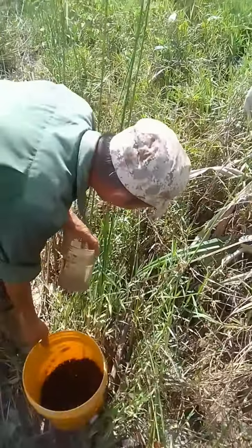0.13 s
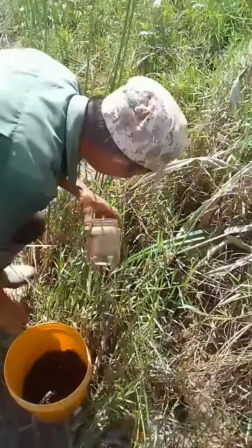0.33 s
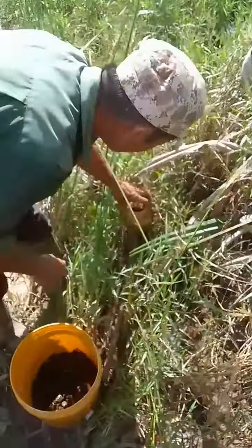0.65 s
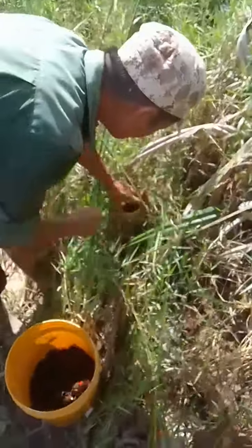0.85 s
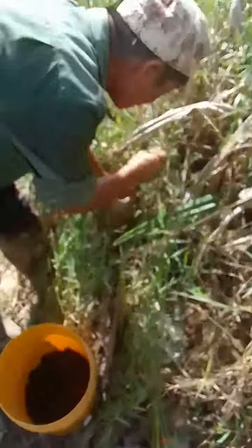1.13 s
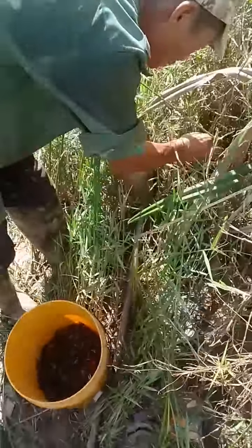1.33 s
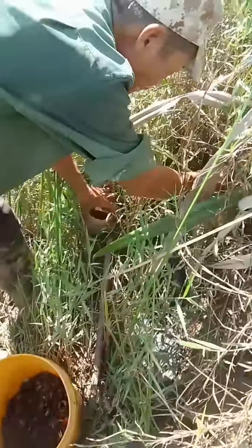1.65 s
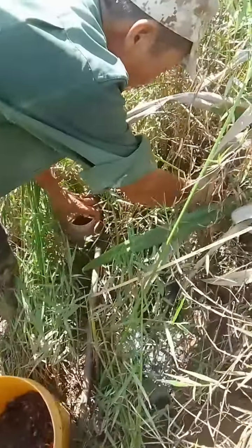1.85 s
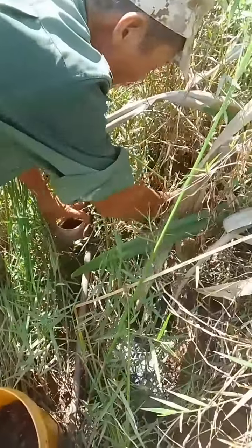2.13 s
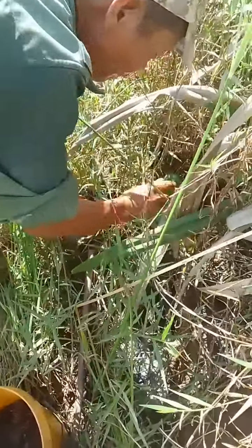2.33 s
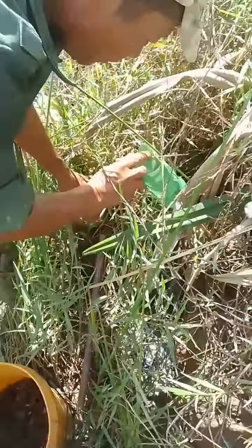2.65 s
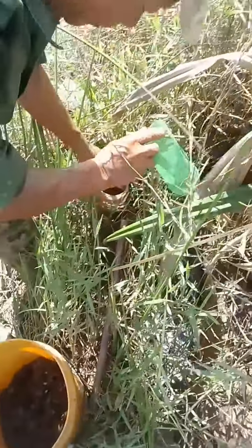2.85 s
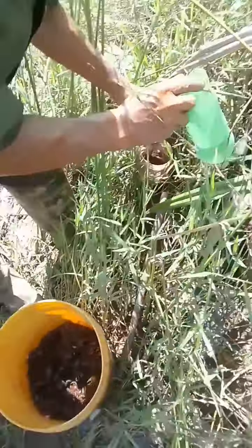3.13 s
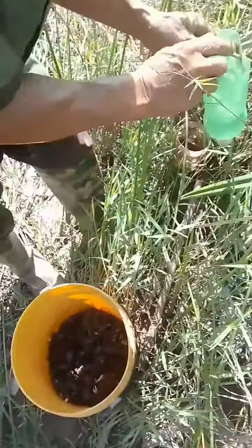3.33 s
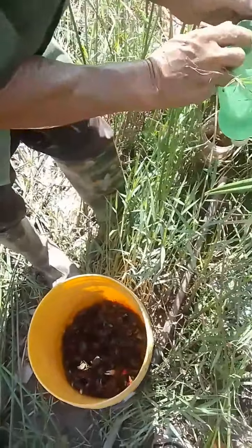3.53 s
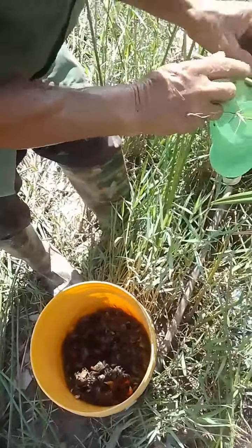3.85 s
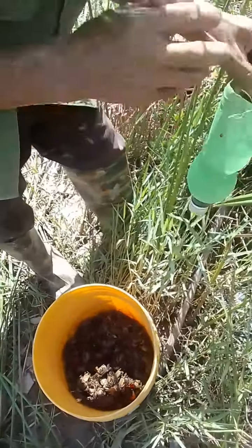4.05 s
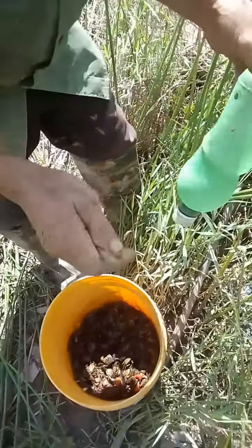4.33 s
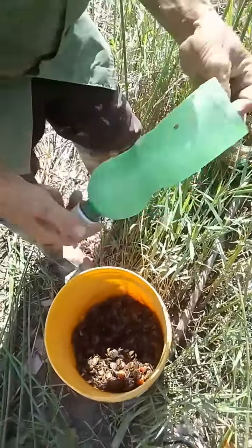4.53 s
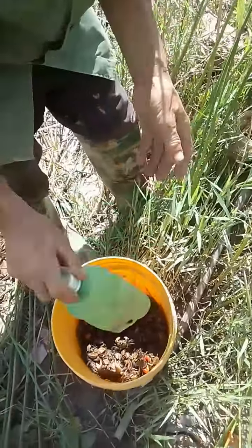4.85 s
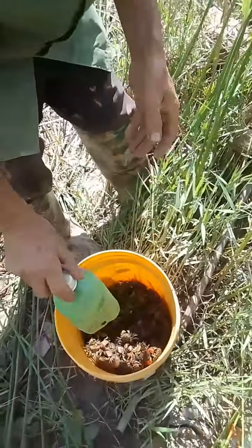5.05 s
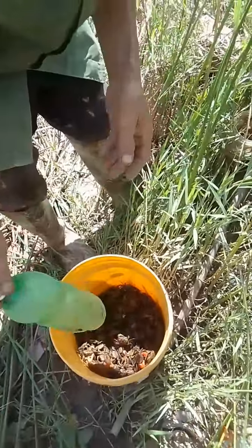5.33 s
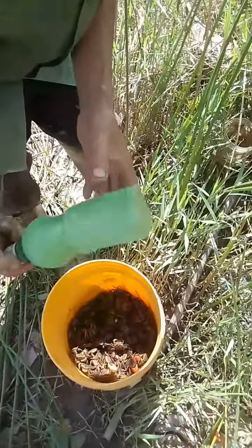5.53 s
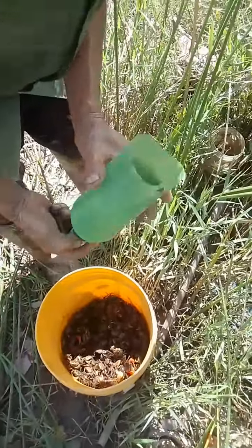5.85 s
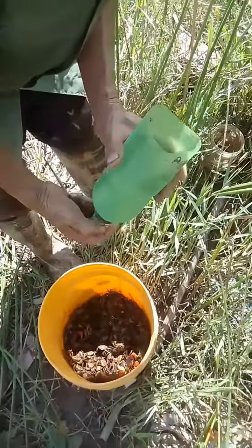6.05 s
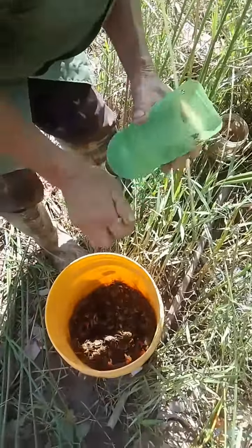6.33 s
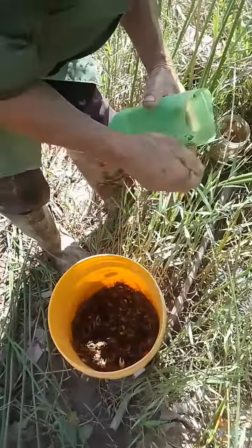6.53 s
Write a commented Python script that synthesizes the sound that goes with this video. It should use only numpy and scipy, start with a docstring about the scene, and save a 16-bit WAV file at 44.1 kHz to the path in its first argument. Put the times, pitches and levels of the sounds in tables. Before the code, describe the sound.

Close outdoor sound on a grassy bank, with quiet open air and a far slow one-cylinder engine thumping about eight or nine times a second throughout. From 0 to 1.5 s, dry blades hiss and crackle under hands, with thin stem snaps and a sharper crack near 1.2 s. The thickest stem breaks hard at 1.6 s. Between 1.8 and 2.25 s a hollow plastic trap knocks and scrapes, then clacks loose loudly at 2.3 s. Bright rustling and crisp snaps continue to about 3.2 s, then thin out. Soft knocks and gritty drags come at 3.8 to 4.1 s. From 4.4 s the bottle is shaken: dull low booms and light shell ticks, strongest at 5.04 and 5.14 s, with a tiny squeak just before. A faint distant bird whistles around 5.25 s. One last soft boom and tick at 5.65 s, a light brush of grass, then near quiet until 6.7 s.

```python
"""On a grassy riverbank, a plastic bottle trap is pulled free and small crabs are shaken into a bucket.
Friction noise and tiny slips make the blades rustle; short bursts of coloured noise make the stems snap.
Damped modes make the hollow trap knock and boom; flurries of impulses excite shells and plastic wall.
Far off, a slow one-cylinder engine thumps as echoed pulses over a harmonic drone, and a bird whistles
once; a narrow band of noise near 2.2 kHz wavers and swells."""
import sys
import numpy as np
from scipy import signal
from scipy.fft import rfft, irfft, next_fast_len
from scipy.io import wavfile
from scipy.ndimage import uniform_filter1d, map_coordinates

SR = 44100
rng = np.random.default_rng(int(sys.argv[2]) if len(sys.argv) > 2 else 0)


def to_wav(sig):
    """Store sig (one row per channel, or 1-D mono) as 16-bit WAV at the path in sys.argv[1].

    Samples outside -1..1 are clipped; the rate is SR.
    """
    pcm = np.clip(np.atleast_2d(sig), -1, 1) * 32767
    pcm = np.round(pcm).astype(np.int16)
    wavfile.write(sys.argv[1], SR, pcm.T)  # frames by channels


N = 294856
TIME = np.arange(N) / SR
RING = TIME[:SR // 5]  # time axis of one short hit
TOP_HZ = 15750  # upper edge of the audible band

# Spectrum of open air: frequency_hz, relative_density_db
AIR_SPECTRUM = [(25, -32), (72, -30.5), (105, -10.5), (170, 1.5), (260, -1.5), (370, -6.5), (580, -4),
                (850, -6), (1000, -9), (1280, -16), (1550, -37), (2900, -35), (6000, -37), (15000, -52)]
# Spectrum of the narrow band of noise: frequency_hz, relative_density_db
NARROW_BAND_SPECTRUM = [(1620, -39.5), (1830, -2.5), (2020, 1.5), (2300, 3.5), (2550, -5), (2850, -36),
                        (4000, -46)]
# The narrow band swells: start_s, length_s, level_db
NARROW_BAND_SWELLS = [(0.0, 0.079, -47), (.57, 0.51, -54), (2.3, 0.24, -56), (3.42, 0.058, -52.5),
                      (4.18, 0.18, -55), (5.55, 0.11, -57), (5.75, 0.011, -53.5), (6.17, 0.4, -67.5)]
NARROW_BAND_DB, NARROW_BAND_WAVER_DB, NARROW_BAND_WAVERS_PER_S = -63, 1.5, 26  # between swells
NARROW_BAND_ATTACK_S, NARROW_BAND_T60_S = 0.0032, 0.21

FIRING_HZ = 8.6
# Exhaust pulse and its echoes: delay_s, relative_level_db
THUMPS = [(0, 1), (0.015, -3), (.04, -2), (.077, -2), (0.097, -11)]
# Modes of one thump: frequency_hz, relative_level_db, t60_s
THUMP_MODES = [(189.7, -9, 0.038), (249.3, -2.5, 0.04)]
# Exhaust pipe drone: multiple_of_firing_rate, relative_level_db
DRONE = [(12, -69.5), (15, -74.5), (18, -77), (21, -70), (22, -61), (26, -62.5), (29, -63.5), (30, -65.5),
         (32, -65.5), (33, -67.5)]
# Whistle of a far bird: time_s, pitch_hz, relative_level_db
CHIRP = [(5.22, 3150, -75), (5.245, 3260, -55), (5.268, 3510, -58), (5.282, 2730, -59), (5.31, 2610, -71)]

# Brushed blades: frequency_hz, relative_density_db
BRUSH_SPECTRUM = [(2500, -35), (5000, -33), (7000, -10.5), (8300, 0), (9400, 3.5), (10400, -3),
                  (12000, -14.5), (14000, -18.5), (15800, -22)]
# Crushed blades: frequency_hz, relative_density_db
CRUSH_SPECTRUM = [(250, -32), (600, -0.5), (1000, -1.5), (1600, -4), (2300, 7), (3000, 0), (4500, 0),
                  (6500, 0), (9000, -2), (15000, -13)]
# Rubbing sleeves: frequency_hz, relative_density_db
CLOTH_SPECTRUM = [(400, -12), (900, -6.5), (1350, 2.5), (1700, -3), (2300, -2.5), (2900, -27), (6000, -36)]
# Restless grass between strokes, before STIR_DB is added: time_s, level_db
STIR = [(0.0, -46.5), (0.43, -57), (0.59, -49), (0.99, -47), (1.54, -45.5), (1.88, -49), (2.16, -48.5),
        (2.35, -44.5), (3.09, -46), (3.48, -59.5), (4.32, -57.5), (5.05, -56.5), (5.51, -64.5),
        (5.9, -60.5), (6.2, -70), (6.69, -62.5)]
STIR_DB = -1.5
# Hand, leg or trap sweeps the grass: start_s, length_s, brushing_db, crushing_re_brushing_db, t60_s
STROKES = [(0.388, 0.21, -43.5, -37, 0.33), (0.606, 0.16, -41.5, -7.5, 0.35),
           (1.162, 0.077, -45, -5.5, 0.23), (1.522, 0.055, -38.5, -9, 0.14), (2.123, 0.1, -43.5, -6.5, .3),
           (2.28, 0.075, -40, -5.5, 0.51), (2.507, 0.051, -35, -12.5, 0.24),
           (2.849, 0.082, -38.5, -9.5, .25), (3.062, 0.13, -40, -3, 0.38), (3.28, 0.17, -53.5, -3.5, 0.61),
           (3.592, 0.06, -47.5, -13, 0.13), (3.823, 0.084, -57, -8, 0.33), (3.923, 0.17, -49, -0.5, 0.05),
           (4.677, 0.04, -62, -11, .3), (5.617, 0.14, -60, -4.5, 0.43), (5.858, 0.056, -50.5, -7.5, 0.54)]
STROKE_ATTACK_S = 0.047
CRUSH_EVEN_DB, CRUSH_GROWS = -39, 1.637  # stirring where both gains agree; crushing dB per brushing dB
CLOTH_DB, CLOTH_GROWS = -55.5, 0.63  # sleeve level at that stirring; its dB per brushing dB
# Pitch range of flicked blades: lowest_hz, highest_hz
BLADE_HZ = (2800, 11000)

# Dry stems snap: start_s, crack_db, body_re_crack_db, body_pitch_hz, t60_s
SNAPS = [(.214, -48, 7.5, 2220, 0.025), (0.508, -33.5, -7, 2420, 0.0061), (0.577, -37, -14, 4000, 0.022),
         (0.655, -35, -10, 3600, .014), (.7105, -32, -8, 4000, .01), (1.096, -31.5, -7, 4570, 0.014),
         (1.142, -33, -17, 3500, 0.024), (1.1869, -21.5, -11, 3550, 0.024), (1.453, -35, 1.5, 5190, 0.036),
         (1.6114, -17.5, -16, 2900, 0.012), (1.661, -28, -9, 4460, 0.029), (1.7991, -31, -14, 3450, 0.024),
         (1.9622, -37.5, 0, 2200, 0.018), (2.151, -33.5, -8, 3000, 0.022), (2.555, -33, -15, 5500, .02),
         (2.566, -25.5, -16, 5500, 0.067), (2.591, -27, -15, 6000, 0.028), (2.679, -30, -7.5, 2430, .022),
         (2.8, -33.5, -3, 3010, 0.035), (2.896, -27.5, 5.5, 3540, .012), (2.912, -23.5, -5.5, 5240, 0.052),
         (3.113, -25.5, -8, 4800, .014), (3.147, -23.5, -16, 5000, 0.056),
         (3.456, -35.5, -3.5, 4600, 0.018), (3.482, -37, -0.5, 5700, 0.03), (3.812, -39, -16, 3000, 0.016)]
# Crack of a stem: frequency_hz, relative_density_db
STEM_SPECTRUM = [(900, -47), (3000, -28), (5000, -18), (7000, -8.5), (8600, 0.5), (9700, 3), (11000, -6.5),
                 (12500, -12), (15500, -24)]
# Woody body of a stem: multiple_of_body_pitch, relative_density_db
WOOD_SPECTRUM = [(.08, -50), (.25, -18), (.55, -3.5), (1, 6), (1.5, -4), (3, -15), (8, -42)]
# Break of the thickest stem: start_s, level_db
STALK_BREAK = (1.6115, -24)
# Modes of the thickest stem: frequency_hz, relative_level_db, t60_s
STALK_MODES = [(1430, 1, 0.016), (1800, -3, 0.0055), (2890, -7, 0.01)]

# Gritty scraping: frequency_hz, relative_density_db
SCRAPE_SPECTRUM = [(200, -28.5), (450, 2), (600, 5.5), (850, -4), (1150, -13.5), (1420, -1.5), (1750, -14),
                   (2300, 0.5), (3000, -14.5), (8000, -25.5)]
# The trap drags over stems and mud: start_s, length_s, level_db
DRAGS = [(1.565, 0.015, -45), (2.022, 0.041, -45.5), (2.085, 0.036, -47), (2.165, 0.044, -44.5),
         (2.24, 0.014, -44.5), (3.812, 0.035, -48), (3.93, 0.055, -49.5), (3.985, 0.094, -43.5),
         (4.375, 0.019, -48)]
DRAG_ATTACK_S, DRAG_T60_S = 0.0052, 0.18
# Knocks on the hollow trap: start_s, body_level_db, lowest_mode_hz, brightness_db
KNOCKS = [(1.8235, -27, 578, 1), (1.8528, -24.5, 577, 3.5), (1.9192, -26.5, 567, 2),
          (2.0905, -31.5, 547, 7.5), (2.107, -36.5, 540, 8), (2.1835, -26, 538, 6.5),
          (2.201, -30.5, 525, -2), (2.253, -32, 540, 5), (3.826, -40.5, 493, -7), (3.993, -35.5, 552, 6.5),
          (4.017, -33.5, 690, -5), (4.059, -37.5, 660, 9)]
# Modes of the trap: multiple_of_lowest_mode, relative_level_db, t60_s
TRAP_MODES = [(1, 1.5, 0.045), (1.19, 4, 0.048), (2.52, -7, 0.05), (2.68, -2, 0.034), (4.1, -11.5, 0.021),
              (5.8, -16, 0.023)]
REBOUND_S = 0.00545
# The trap pulls free: start_s, body_level_db
CLACK = (2.312, -16.5)
# Modes of that clack: frequency_hz, relative_level_db, t60_s
CLACK_MODES = [(478, -3, 0.055), (572, -1, 0.062), (775, -16, 0.031), (960, -2, 0.053), (1405, -13, 0.082),
               (1760, -11, 0.031), (1815, -1, 0.026), (2253, 0, 0.024), (2690, -11, 0.03),
               (3120, -20, 0.033)]

# Crabs skitter on plastic: start_s, shell_level_db, length_s, wall_re_shell_db
CRABS = [(4.401, -41.5, 0.015, -2.5), (4.55, -43.5, 0.0086, -2.5), (4.692, -43.5, 0.022, -4),
         (4.703, -44, 0.019, -15), (4.752, -36.5, 0.0094, -4), (5.0359, -25, 0.0085, -3.5),
         (5.138, -29, 0.01, -13.5), (5.194, -40, 0.015, -11), (5.216, -37, 0.014, -13),
         (5.646, -48, 0.0088, 2)]
# Struck shells and legs: frequency_hz, relative_density_db
SHELL_SPECTRUM = [(900, -15.5), (2000, 0.5), (2900, -5), (4000, -7), (6500, -6), (8300, 3.5), (9600, 7.5),
                  (11500, -11), (15500, -32)]
# Modes of the plastic wall: frequency_hz, relative_level_db, t60_s
WALL_MODES = [(1170, -10.5, .03), (2090, -6.5, 0.024), (2320, -12, 0.024), (2397, -1, 0.019),
              (3672, -6, 0.022), (4300, -8, 0.017)]
# Shakes make the bottle boom: start_s, boom_level_db, air_mode_hz
SHAKES = [(4.378, -38, 567), (4.71, -31.5, 583), (5.0405, -31, 614), (5.127, -42, 603), (5.143, -35.5, 600),
          (5.191, -34, 594), (5.651, -33.5, 575)]
# Modes of the bottle: multiple_of_air_mode, relative_level_db, t60_s
BOTTLE_MODES = [(.86, 4, 0.023), (1, -1, 0.13), (1.08, 3, .03), (1.6, -15.5, 0.081)]
# A claw slides on the wall: frequency_hz, wobble_knots_per_s, relative_level_db
SQUEAK = [(2240, 60, 1), (3600, 70, -2), (4000, 70, -5), (4400, 120, -15)]


def amp(db):
    """Level law: decibels to amplitude gain."""
    return 10 ** (np.asarray(db) / 20)


def unit(x):
    """Power normalisation: scale to rms 1."""
    return x / np.sqrt(np.mean(x ** 2) + 1e-20)


def crest(x):
    """Peak power: the loudest millisecond gets the power of a sine of height 1."""
    power = uniform_filter1d(x ** 2, size=SR // 1000)
    return x / np.sqrt(2 * power.max())


def curves(rows):
    """Linear interpolation: one value per sample for each column after the time."""
    s, *columns = np.transpose(rows)
    return [np.interp(TIME, s, column) for column in columns]


def wobble(rate):
    """Slow random modulation: a smooth curve through rate random knots a second."""
    knots = rng.standard_normal(int(N * rate / SR) + 4)
    return map_coordinates(knots, [TIME * rate])


def colour(x, points):
    """Minimum-phase filtering: folding the cepstrum makes the gain of the points causal."""
    size = 2 * next_fast_len(len(x) // 2 + 2048)
    hz, db = np.transpose(points)
    gain_db = np.interp(np.log(np.fft.rfftfreq(size, 1 / SR) + 1), np.log(hz), db)
    cepstrum = irfft(np.log(amp(gain_db)))
    cepstrum[1:size // 2] *= 2
    cepstrum[size // 2 + 1:] = 0
    response = np.exp(rfft(cepstrum))
    return irfft(rfft(x, size) * response)[:len(x)]


def noise(points):
    """Spectral shaping: white noise filtered to a colour, rms 1."""
    return unit(colour(rng.standard_normal(N), points))


def burst(spectrum, fade):
    """Transient noise: a short puff, enveloped and then coloured."""
    return crest(colour(fade * rng.standard_normal(len(RING)), spectrum))


def grains(rate, spread_db, size):
    """Shot noise: tiny impulses at random moments, of unequal strength."""
    chance = rng.random(size)
    strength = np.minimum(rng.standard_normal(size), 2)
    sign = rng.choice([-1, 1], size)
    return unit((chance < rate / SR) * sign * amp(spread_db * strength))


def ring(modes, cycles, base_hz=1, tilt_db=0, scatter=1):
    """Modal resonance: damped sines build up over a few cycles; tilt is per octave, scatter in turns."""
    out = np.zeros(len(RING))
    for k, (ratio, db, t60) in enumerate(modes):
        turns = base_hz * ratio * RING
        octaves = np.log2(ratio / modes[0][0])
        level_db = db + tilt_db * octaves + rng.normal(0, 1)
        decay = amp(level_db - 60 * RING / t60)
        onset = 1 - np.exp(-(turns / cycles) ** 2)
        tone = np.sin(2 * np.pi * (turns + scatter * rng.random()))
        out += (-1) ** k * decay * onset * tone
    return crest(out)


def add(track, s, sound):
    """Superposition: mix a sound in at time s."""
    part = track[max(0, round(s * SR)):][:len(sound)]
    part += sound[:len(part)]


def swells(rows, attack, t60s):
    """Power summation: overlapping gestures each rise, hold and decay exponentially."""
    power = np.zeros(N)
    for (s, length, db), t60 in zip(rows, np.broadcast_to(t60s, len(rows))):
        t = TIME[:round((length + t60) * SR)]
        rise = np.minimum(t / attack, 1)
        decay = amp(db - 60 * np.maximum(t - length, 0) / t60)
        add(power, s, (rise * decay) ** 2)
    return np.sqrt(power)


def patchy(x, depth_db):
    """Time-frequency modulation: the colour shifts in small random patches."""
    z = signal.stft(x, nperseg=512)[2]
    field = uniform_filter1d(rng.standard_normal(z.shape), size=4, axis=0)
    field = uniform_filter1d(field, size=6, axis=1)
    return signal.istft(z * amp(depth_db * unit(field)), nperseg=512)[1][:N]


def rustle(spectrum, rate, spread_db, clump_db, smooth, patchy_db):
    """Stick-slip friction: clumps of tiny slips over a share of smooth noise."""
    clumps = amp(clump_db * np.minimum(wobble(110), 1))
    slips = unit(grains(rate, spread_db, N) * clumps)
    friction = slips + smooth * rng.standard_normal(N)
    return unit(colour(patchy(friction, patchy_db), spectrum))


def ticks(rate, spread_db, cycles):
    """Free vibration: single blades flick, each ringing briefly at its own pitch."""
    out, t = np.zeros(N), RING[:SR // 50]
    for when, pitch, strength, life in rng.random((int(rate * N / SR), 4)):
        turns = np.interp(pitch, [0, 1], BLADE_HZ) * t
        decay = amp(spread_db * strength ** 2 - 60 * turns / (cycles * (0.5 + life)))
        add(out, when * N / SR, decay * np.sin(2 * np.pi * turns))
    return unit(np.gradient(out))


def air_and_narrow_band():
    """Filtered noise: steady open air under a narrow band near 2.2 kHz that wavers and swells."""
    swelling = swells(NARROW_BAND_SWELLS, NARROW_BAND_ATTACK_S, NARROW_BAND_T60_S)
    level = np.hypot(amp(NARROW_BAND_DB), swelling)
    waver = amp(NARROW_BAND_WAVER_DB * wobble(NARROW_BAND_WAVERS_PER_S))
    narrow_band = level * waver * unit(patchy(noise(NARROW_BAND_SPECTRUM), depth_db=2.5))
    return amp(-57) * noise(AIR_SPECTRUM) + narrow_band


def engine():
    """Periodic excitation: firings thump and echo along the bank; the pipe drones on their multiples."""
    firings = np.zeros(N)
    for s in np.arange(0.106, N / SR, 1 / FIRING_HZ):
        for delay, db in THUMPS:
            thump = ring(THUMP_MODES, cycles=0.83)
            add(firings, s + delay, amp(db + rng.normal(0, 1.25)) * thump)
    turns = FIRING_HZ * TIME + 0.0059 * wobble(2.07)  # slightly unsteady phase
    drone = np.zeros(N)
    for order, db in DRONE:
        drone += amp(db) * np.sqrt(2) * np.sin(2 * np.pi * (order * turns + rng.random()))
    return amp(-44.5) * firings + amp(-2.0) * drone


def bird():
    """Frequency modulation and scattering: a faint whistle rises, then falls, blurred by the reeds."""
    hz, db = curves(CHIRP)
    sounding = (TIME > CHIRP[0][0]) * (TIME < CHIRP[-1][0])
    call = amp(db) * np.sin(2 * np.pi * np.cumsum(hz) / SR) * sounding
    reeds = rng.standard_normal(len(RING)) * amp(-60 * RING / 0.83)
    blurred = signal.fftconvolve(call, reeds / np.linalg.norm(reeds))[:N]
    return amp(-3) * call + amp(-5) * blurred


def grass():
    """Friction under load: brushed blades hiss, pressed ones crackle and flick, and sleeves rub along."""
    stir_db = curves(STIR)[0] + STIR_DB
    effort_db = stir_db - CRUSH_EVEN_DB
    s, length, db, crush_db, t60 = np.transpose(STROKES)
    brushed = swells(np.transpose([s, length, db]), STROKE_ATTACK_S, t60)
    crushed = swells(np.transpose([s, length, db + crush_db]), STROKE_ATTACK_S, t60)
    brushing = np.hypot(amp(stir_db), brushed)
    crushing = np.hypot(amp(CRUSH_EVEN_DB + CRUSH_GROWS * effort_db), crushed)
    hiss = amp(-0.6) * rustle(BRUSH_SPECTRUM, rate=800, spread_db=1.5, clump_db=4,
                              smooth=0.83, patchy_db=3.0)
    crackle = amp(2.5) * rustle(CRUSH_SPECTRUM, rate=900, spread_db=2.5, clump_db=4,
                                smooth=0.78, patchy_db=2.5)
    flicks = amp(-3) * ticks(rate=300, spread_db=17, cycles=31)
    sleeve_level = amp(CLOTH_DB + CLOTH_GROWS * effort_db + 1.5 * wobble(24))
    sleeves = sleeve_level * noise(CLOTH_SPECTRUM)
    return brushing * hiss + crushing * (crackle + flicks) + sleeves


def snaps():
    """Brittle fracture: a crack with a woody pitch and a brief noisy tail; the thickest stem rings."""
    out = np.zeros(N)
    for s, db, body_db, hz, t60 in SNAPS:
        fade = amp(-60 * RING / t60) + amp(-16 - 60 * RING / 0.12)
        wood = [(ratio * hz, level_db) for ratio, level_db in WOOD_SPECTRUM]
        crack = burst(STEM_SPECTRUM, fade)
        body = amp(body_db) * burst(wood, fade)
        add(out, s, amp(db) * (crack + body))
    s, db = STALK_BREAK
    add(out, s, amp(db) * ring(STALK_MODES, cycles=0.7, scatter=0.083))
    return out


def trap():
    """Impact on a hollow body: the gritty trap drags, knocks with a dull rebound, and clacks free."""
    scrape = rustle(SCRAPE_SPECTRUM, rate=600, spread_db=2.0, clump_db=2.5, smooth=0.84, patchy_db=4)
    out = swells(DRAGS, DRAG_ATTACK_S, DRAG_T60_S) * scrape
    for s, db, hz, bright_db in KNOCKS:
        body = ring(TRAP_MODES, cycles=1.5, base_hz=hz, tilt_db=bright_db, scatter=0.054)
        grit = amp(bright_db - 12) * burst(SCRAPE_SPECTRUM, amp(-60 * RING / 0.11))
        add(out, s, amp(db) * (body + grit))
        rebound = ring(TRAP_MODES[:2], cycles=1.5, base_hz=hz, scatter=0.11)
        add(out, s + REBOUND_S, amp(db - 5.5) * rebound)
    s, db = CLACK
    grit = amp(-6) * burst(SCRAPE_SPECTRUM, amp(-60 * RING / 0.08))
    add(out, s, amp(db) * (ring(CLACK_MODES, cycles=2.15) + grit))
    return out


def squeak():
    """Sliding friction: a claw on the bottle sounds as a cluster of wobbling tones in a brief swell."""
    slide = np.zeros(N)
    for hz, knots_per_s, db in SQUEAK:
        slide += amp(db) * wobble(knots_per_s) * np.sin(2 * np.pi * hz * TIME)
    return unit(slide) * amp(-50.5) * np.exp(-((TIME - 5.017) / 0.02) ** 2)


def crabs():
    """Impulsive and cavity excitation: flurries of legs and shells ring the wall; shaken air booms."""
    out = np.zeros(N)
    for s, db, length, wall_db in CRABS:
        fade = np.exp(-(RING / length) ** 4) + amp(-9.5 - 60 * RING / 0.14)
        flurry = grains(6000, 2.1, len(RING)) * fade
        shell = crest(colour(flurry, SHELL_SPECTRUM))
        wall = signal.fftconvolve(flurry, ring(WALL_MODES, cycles=1.0))[:len(RING)]
        add(out, s, amp(db) * (shell + amp(wall_db) * crest(wall)))
    for s, db, hz in SHAKES:
        boom = ring(BOTTLE_MODES, cycles=1.14, base_hz=hz)
        slide = amp(-13.0) * burst(SCRAPE_SPECTRUM, amp(-60 * RING / 0.45))  # the catch slides on inside
        add(out, s, amp(db) * (boom + slide))
    return out


def scene():
    """Superposition of all sources at one spot above the bucket."""
    background = air_and_narrow_band() + engine() + bird()
    handling = grass() + snaps() + trap()
    catch = squeak() + crabs()
    return (background + handling + catch)[None]


def record(dry):
    """Band limitation: nothing passes at or above the top frequency."""
    size = next_fast_len(N + SR // 2)
    passband = np.fft.rfftfreq(size, 1 / SR) < TOP_HZ
    return irfft(rfft(dry, size) * passband, size)[:, :N]


dry = scene()
out = record(dry)
to_wav(out)
```